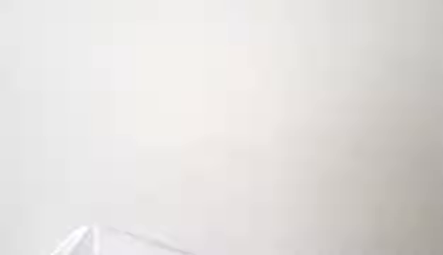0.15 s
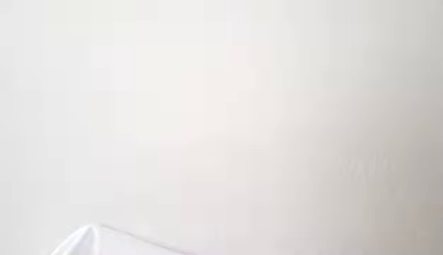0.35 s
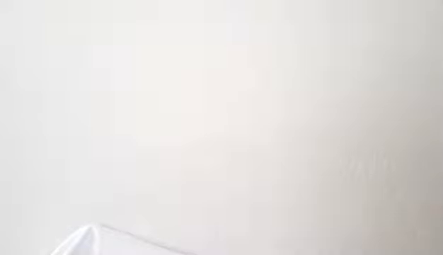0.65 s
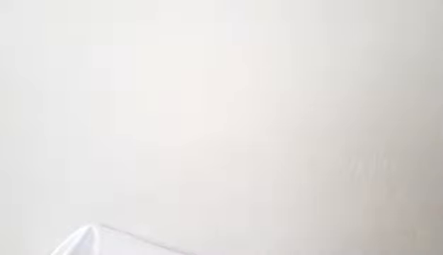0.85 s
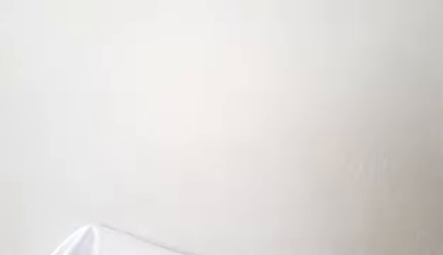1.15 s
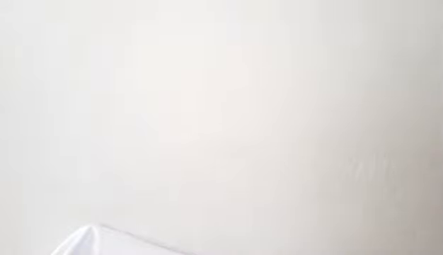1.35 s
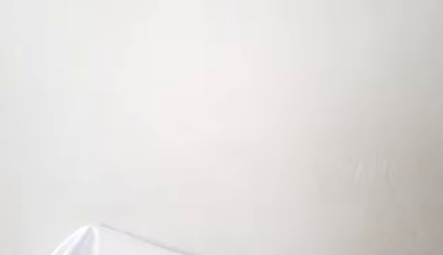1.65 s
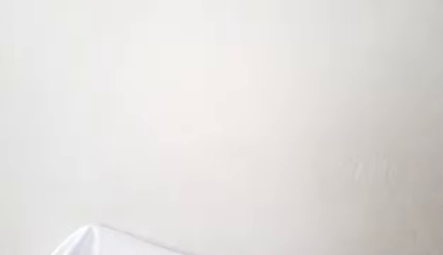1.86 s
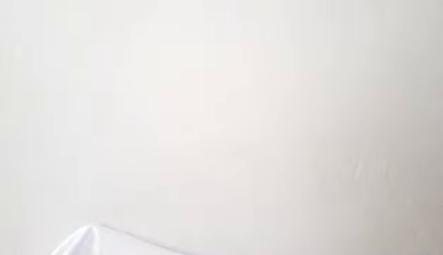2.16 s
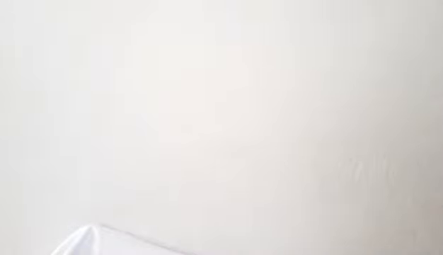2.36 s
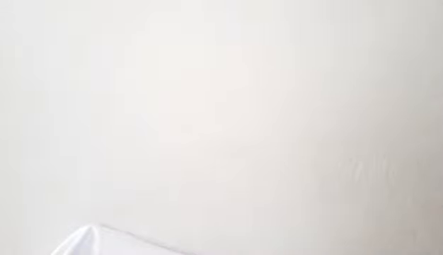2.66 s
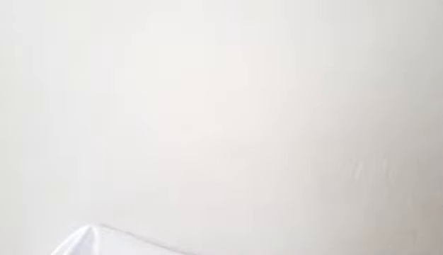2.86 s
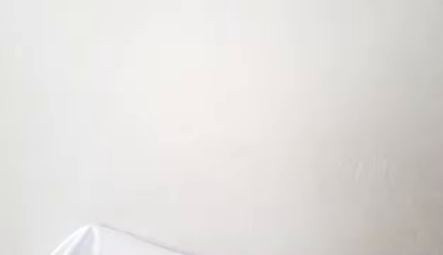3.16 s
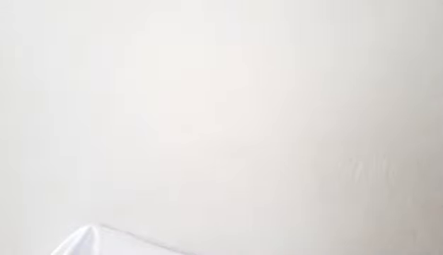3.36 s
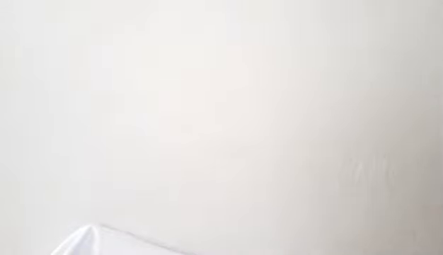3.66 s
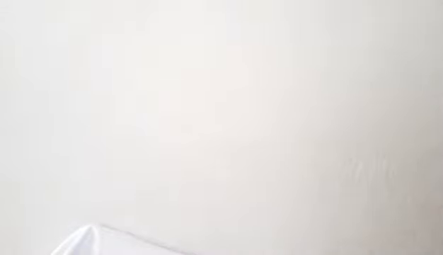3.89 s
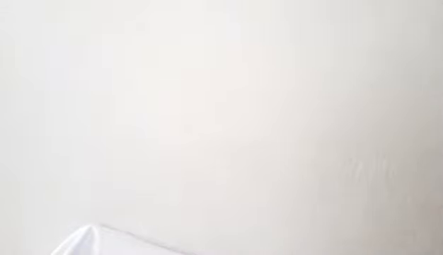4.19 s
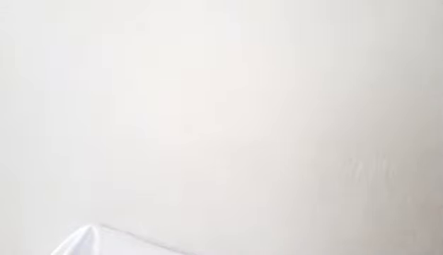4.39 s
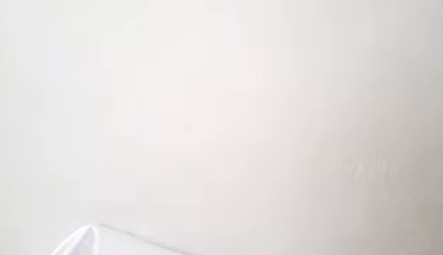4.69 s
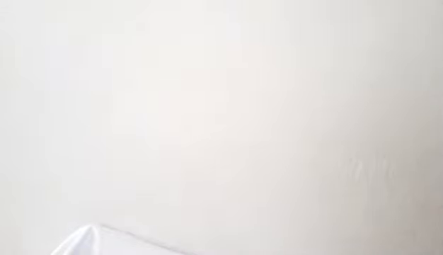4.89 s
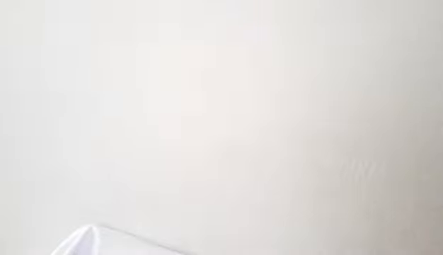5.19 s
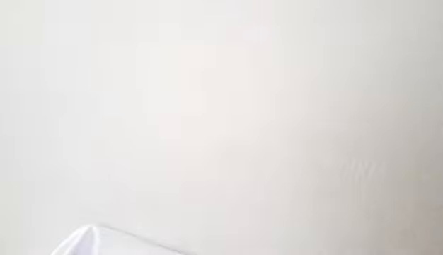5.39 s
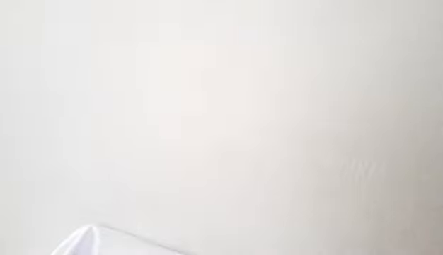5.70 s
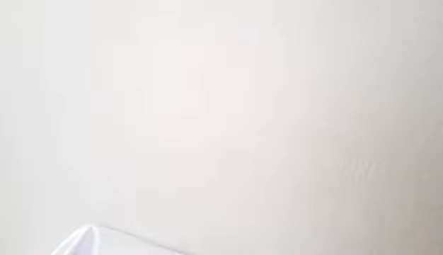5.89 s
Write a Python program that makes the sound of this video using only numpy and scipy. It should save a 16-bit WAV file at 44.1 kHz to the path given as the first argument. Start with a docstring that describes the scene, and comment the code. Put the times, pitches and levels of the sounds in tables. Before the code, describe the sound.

A steel spoon scrapes and clinks on a china plate, hands rustle quietly, then two bright clinks ring out with a short scrape in a quiet kitchen.

```python
"""Spoon, china and wooden table

A steel spoon scrapes and taps a china plate on a wooden table in a small quiet kitchen; a fork and a cup clink.
Struck things are banks of damped sines with noisy contacts; scrapes feed noise into the plate's modes.
Hand rustles, hollow rubs, scuffs, ticks and a whistling hiss are shaped noise; knocks ring the table top.
A fridge motor hums, the building rumbles under microphone hiss, and the walls add a short noise tail."""
import sys
import numpy as np
from scipy import signal
from scipy.fft import rfft, irfft, next_fast_len
from scipy.io import wavfile
from scipy.ndimage import uniform_filter1d, map_coordinates

SR = 44100
rng = np.random.default_rng(int(sys.argv[2]) if len(sys.argv) > 2 else 0)


def store_wav(level_fs):
    """Save 16-bit WAV to argv[1]."""
    pcm = np.round(np.clip(np.atleast_2d(level_fs), -1, 1) * 32767)
    wavfile.write(sys.argv[1], SR, pcm.T.astype(np.int16))


N = 266364
T = np.arange(N) / SR
RING_T = np.arange(SR // 4) / SR  # seconds after a blow


def amp(db):
    """Decibels to linear gain."""
    return 10 ** (np.asarray(db) / 20)


def unit(x):
    """Scale to an rms of 1."""
    return x / np.sqrt(np.mean(x ** 2) + 1e-20)


def along(points, hz):
    """Read a curve of (frequency_hz, value) points on a log frequency axis."""
    point_hz, values = np.transpose(points)
    return np.interp(np.log(hz + 1), np.log(point_hz + 1), values)


def filtered(x, response):
    """Filter x by a complex response of frequency."""
    size = next_fast_len(N + SR // 2)
    spectrum = rfft(x, size) * response(np.fft.rfftfreq(size, 1 / SR))
    return irfft(spectrum, size)[..., :N]


def noise(colour):
    """Noise of rms 1, coloured by a curve in dB."""
    return unit(filtered(rng.standard_normal(N), lambda hz: amp(along(colour, hz))))


def wobble(rate, size=N):
    """A smooth random curve through `rate` knots a second."""
    knots = rng.standard_normal(size // 32)
    return map_coordinates(knots[:int(size * rate / SR) + 4], [T[:size] * rate], order=2)


def complex_noise(values):
    """Two independent random curves as one complex signal."""
    return values() + 1j * values()


def peaks(modes):
    """Causal response of a bank of resonances with alternating signs."""
    def response(f):
        total = 0
        for k, (centre, width, db) in enumerate(modes):
            resonance = 1j * f * width / (centre * centre - f * f + 1j * f * width)
            total = total + (-1) ** k * amp(db) * resonance
        return total
    return response


def add(track, s, sound):
    """Mix a sound in at s seconds."""
    part = track[round(s * SR):][:len(sound)]
    part += sound[:len(part)]


def ring(hz, db, t60, attack, blur):
    """Damped sines at random phases; a drifting phase blurs each into a close cluster."""
    drift = np.cumsum(rng.standard_normal((len(hz), len(RING_T))), axis=1) / SR
    phase = rng.uniform(0, 2 * np.pi, (len(hz), 1)) + blur * hz[:, None] * drift
    decay = amp(db[:, None] - 60 * RING_T / t60[:, None])
    modes = decay * np.sin(2 * np.pi * hz[:, None] * RING_T + phase)
    return (modes * (1 - np.exp(-RING_T / attack))).sum(0)


def swell(s, rise, fall):
    """An envelope straight in dB around its peak at s; slopes in s per 20 dB, at least 0.005."""
    return amp(-20 * np.where(T < s, (s - T) / max(rise, .005), (T - s) / max(fall, .005)))


# Colour of the room rumble: frequency_hz, level_db
ROOM_COLOUR = [(13, -37), (22, -4), (60, 0), (102, 0), (222, -9), (313, -5.5), (413, -13), (552, -17),
               (600, -20), (780, -51.5), (1320, -120)]
# Colour of the microphone hiss: frequency_hz, level_db
HISS_COLOUR = [(290, -34), (500, -5), (828, 1.5), (929, -8.5), (1010, -5.5), (3110, -9.5), (3700, -14),
               (4660, -14.5), (5780, -30.5), (12000, -3.5), (15600, -7)]
# Level line of the low bumps in the building, before trim: time_s, level_db
BUMP_LEVELS = [(0.0, -59.5), (0.69, -63.5), (0.99, -61.5), (1.15, -68.5), (1.61, -71), (1.68, -62.5),
               (1.98, -62), (2.45, -59.5), (2.56, -66.5), (3.75, -72.5), (3.9, -59.5), (4.4, -60.5),
               (4.89, -67), (5.05, -70), (5.2, -60.5), (5.75, -72.5), (6.0, -60.5)]
# Colour of those bumps: frequency_hz, level_db
BUMP_COLOUR = [(22, -31.5), (40, -1), (85, 0), (130, -6), (220, -35)]
# Fridge motor tones, before trim: pitch_hz, level_db
HUM_TONES = [(296.1, -84), (398.4, -83)]
ROOM_DB, HISS_DB = -70, -72


def background():
    """Steady hiss, uneven rumble and low bumps are coloured noise; the motor hum is wavering sines."""
    hum = 0
    for hz, db in HUM_TONES:
        level = amp(db + 2.5 + 4.53 * wobble(9))
        hum = hum + level * np.sin(2 * np.pi * hz * T + .8 * wobble(14))
    bump_db = np.interp(T, *np.transpose(BUMP_LEVELS)) - 2.5 + 2.9 * wobble(9)
    bumps = amp(bump_db) * noise(BUMP_COLOUR)
    rumble = amp(ROOM_DB + 2.46 * wobble(9.2)) * noise(ROOM_COLOUR)
    return rumble + amp(HISS_DB) * noise(HISS_COLOUR) + bumps + hum


# Plate modes, for scrapes and taps: pitch_hz, rim_scrape_db, rim_strike_db, well_strike_db,
# well_scrape_db, t60_s (ringing freely)
PLATE_MODES = [(2241.6, -29.5, 3.5, -19.5, -25.5, 0.06), (2335, -5.5, -18.5, -16.5, -4, 0.17),
               (2475.9, -6, -5, -6, 2.5, 0.148), (2656.6, -18.5, 0, 4.5, -12, 0.0765),
               (2687, -20, -22, -1.5, -7, 0.1215), (3747, -24, -17, -40, -27, 0.07),
               (4669, -12, -16, -32, -20.5, 0.09), (4904, -20, -12.5, -16, -39.5, 0.072),
               (5778, -24, -19, -10, -14, 0.17), (5845, -17, -17, -8, -15.5, 0.17),
               (6300, 0.5, -4.5, -8, -16, 0.161), (6445, -14, -5.5, -7.5, -6.5, 0.12),
               (6711, -11, -5.5, -7.5, -3.5, 0.13), (7224, -4, -4.5, -13.5, 1.5, 0.22),
               (7337, -3.5, -10, -24.5, -25, 0.1998), (7620, -25, -15.5, -17, -14, 0.148),
               (7960, -17, -13.5, -24, -24, 0.1), (8322, 3, 3.5, -13.5, -6, 0.11),
               (8887, -9, -7.5, -20.5, -8, 0.1), (9280, -21, -18, -20, -11.5, 0.12),
               (9460, -11, -16, -23.5, -23, 0.0992), (9920, 1, -10, -15.5, -22, 0.1),
               (10210, -2.5, -6.5, -13, -13, 0.083), (10532, -20.5, -8, -10.5, -11, 0.14),
               (10780, -21.5, -8, -24, -17, 0.086), (11653, -22.5, -16.5, -2.5, -13, 0.12),
               (11984, -18.5, -13.5, -8.5, -4, 0.1), (12207, -7, -2.5, -8, -2, 0.12),
               (12650, -12.5, -4.5, -7.5, -7.5, 0.11), (12880, -22, -13, -10, -15, 0.1),
               (13450, -8.5, -10.5, -9.5, -7.5, 0.11), (13840, -4, -12.5, -10, -12, 0.11),
               (14260, -5.5, -6, -14.5, -13.5, 0.085), (15015, -14.5, -16, -8, -11, 0.09)]
# Unpitched part of steel on glaze, for rim scrapes and taps: frequency_hz, level_db
GLAZE_GRIT = [(530, -37), (900, -25.5), (1880, -14), (2390, 5), (3260, -15.5), (6500, -18), (7770, -11),
              (8650, -11), (12500, -12), (15500, -18)]
# Duller unpitched rasp in the well: frequency_hz, level_db
WELL_RASP = [(470, -42.5), (800, -17.5), (2180, -8.5), (2440, -11.5), (3130, -11), (7010, -17.5),
             (15500, -22)]
# Spoon drags, levels before trim: touch_s, middle_s, lift_s, touch_db, middle_db, lift_db,
# touch_tilt_db_per_octave, lift_tilt_db_per_octave, well_share (0 rim, 1 well)
RIM_DRAGS = [(0.0, .005, 0.0302, -36.5, -42.5, -48.5, -1, -3, 0.175),
             (.078, .144, 0.166, -45, -37.5, -45, 0, 2, 0.278),
             (.265, .32, 0.3874, -58.5, -43, -46, 6.5, -2.5, 0.05),
             (.45, .5, 0.515, -43.5, -44, -53, 0.14, -2.5, 0.684)]
WELL_DRAGS = [(4.43, 4.48, 4.525, -50, -46.5, -49, .01, .01, 1),
              (4.535, 4.584, 4.7044, -48.5, -44.5, -58.5, .01, .01, 0.7)]
SET_IN_DB_PER_S, DIE_AWAY_DB_PER_S = 701.5, 367.5  # slopes before touch and after lift
WANDER = .0045  # pitch drift of a mode under the moving spoon, as a share of its pitch


def scrape(strokes, start, grit, grit_db, free):
    """Rough glaze shakes the spoon in uneven grains; as the contact wanders, each mode is fed more or less."""
    span = round(start * SR) + np.arange(SR * 2 // 3)
    t, rows, size = T[span], np.array(strokes), len(span)
    stroke_db = []
    for touch, middle, lift, *levels in strokes:
        before = SET_IN_DB_PER_S * np.maximum(touch - t, 0)
        after = DIE_AWAY_DB_PER_S * np.maximum(t - lift, 0)
        stroke_db.append(np.interp(t, [touch, middle, lift], levels[:3]) - before - after)
    db = np.max(stroke_db, axis=0) + 2.55 * wobble(57.69, size)
    ends = rows[:, 0:3:2].ravel()  # touch and lift times
    tilt = np.interp(t, ends, rows[:, 6:8].ravel())
    well = np.clip(np.interp(t, ends, rows[:, 8].repeat(2)), 0, 1)
    tone = 0
    for hz, rim_db, _, _, well_db, t60 in PLATE_MODES:
        place_db = well * well_db + (1 - well) * rim_db
        level = place_db + tilt * np.log2(hz / 6000) + 3.02 * wobble(19.22, size)
        force = amp(db + level - 10.5) * complex_noise(lambda: rng.standard_normal(size))
        pole = amp(-60 / (free * t60 * SR))  # the spoon's touch leaves this share of the ring time
        shaken = signal.lfilter([np.sqrt(1 - pole ** 2)], [1, -pole], force)
        cycles = hz * np.cumsum(1 + WANDER * wobble(25, size)) / SR
        tone = tone + (shaken * np.exp(2j * np.pi * cycles)).real
    out = np.zeros(N)
    out[span] = tone + amp(db + grit_db) * noise(grit)[span]
    return out


# Whistling hisses and squeals: start_s, turn_s (where the fade begins), start_db, turn_db,
# start_pitch_hz, settled_pitch_hz, air_over_line_db, line_fall_s (per 20 dB)
WHISTLES = [(0.081, 0.153, -74, -68.5, 3855, 4060, -6.5, 0.1),
            (.29, .385, -69.5, -65.5, 4119, 3735, -4, 0.0061),
            (0.376, .4, -56, -50.5, 2720, 2650, -15, 0.0075),
            (1.772, 1.897, -71.5, -58.5, 3600, 3425, 2.5, 0.24),
            (2.09, 2.114, -79.5, -70.5, 3500, 3511, 4.5, 0.01),
            (2.734, 2.856, -84, -73, 3400, 3593, 5.5, 0.21),
            (3.27, 3.32, -81.5, -70, 1900, 2198, -3.5, 0.07),
            (3.662, 3.718, -85, -77.5, 3600, 3710, 3, 0.24),
            (4.56, 4.663, -50, -53.5, 2453, 2490, -16, 0.0165), (5.26, 5.4, -76, -72, 3880, 3494, 3.5, 0.1)]
AIR_FALL_S = 0.0925  # per 20 dB, of the airy skirt
ONSET_S = .02


def whistle():
    """Narrow noise makes a wavering line and wider noise its airy skirt; they slide in pitch, then fade."""
    out, t = np.zeros(N), T[:SR // 2]
    for start, turn, start_db, turn_db, from_hz, to_hz, air_db, line_fall in WHISTLES:
        fade = turn - start + ONSET_S
        pitch = np.interp(t, [.3 * fade, 0.76 * fade], [from_hz, to_hz])
        carrier = np.exp(2j * np.pi * np.cumsum(pitch) / SR)

        def band(rate, fall):
            waver = complex_noise(lambda: wobble(rate, len(t)))
            return unit((carrier * waver).real) * amp(-20 * np.maximum(t - fade, 0) / fall)

        line, air = band(130, line_fall), band(1050, AIR_FALL_S)
        level = amp(np.interp(t, [0, ONSET_S, fade], [-120, start_db, turn_db]))
        add(out, start - ONSET_S, level * (line + amp(air_db) * air))
    return out


# Spoon taps, levels before trim: time_s, level_db, well_share (0 rim, 1 well), tilt_db_per_octave,
# ring_length (factor on t60), clatter_db (relative to the tap)
SPOON_TAPS = [(0.4049, -23, 0.03, 3, 0.96, -1.5), (0.262, -53, 0.08, 3.5, 1.1, -8.5),
              (0.478, -42.5, 0.29, 3, 0.9, -8), (0.57, -58, 0.56, 10, 0.51, 4.5),
              (0.797, -62, 0.6, 12, .6, -15), (0.819, -50, 0.5, 3, .9, -3), (0.858, -54, 0.95, 3, 1.1, -6),
              (3.898, -21, 0.95, 0.25, 0.948, 0.5), (3.9547, -31, 0.9, -2, 0.735, -3),
              (4.004, -42, 0.86, -1, 0.645, -2), (4.2935, -44, 0.23, -1.5, 1.6, -3),
              (4.3557, -20, 0.69, 2.5, 1.174, -4.5), (4.4696, -39, 0.4, 9.5, 1.23, -18.5),
              (4.5185, -38, 0.39, 5.5, 1.52, -20), (4.5523, -35.5, 0.14, 0, 0.88, -11)]


def taps():
    """Each tap rings the plate by where it lands, with a clatter of modes too dense to tell apart."""
    hz, _, rim_db, well_db, _, t60 = np.transpose(PLATE_MODES)
    out, grit, t = np.zeros(N), noise(GLAZE_GRIT), RING_T
    for s, db, well, tilt, length, clatter_db in SPOON_TAPS:
        share = np.clip(well, 0, 1)
        place_db = share * well_db + (1 - share) * rim_db
        levels = place_db + tilt * np.log2(hz / 6000) + rng.normal(0, 0.505, len(hz))
        decay = amp(clatter_db - 60 * t / (0.108 * length)) * (1 - np.exp(-t / 0.0016))
        clatter = grit[round(s * SR):][:len(t)] * decay
        modes = ring(hz, levels, t60 * length, 0.0017, blur=0.3)
        add(out, s - .002, amp(db - 9.0) * (modes + clatter))
    return out


# Soft pitched scuffs of dishes settling: start_s, level_db, centre_hz, t60_s
DISH_SCUFFS = [(0.489, -61.5, 1350, 0.252), (2.09, -64, 1674, 0.264), (2.185, -63, 2850, 0.21),
               (2.19, -69, 1087, 0.234), (2.455, -59, 760.4, 0.225), (1.4, -72, 3126, 0.417),
               (4.13, -65.5, 970, 0.3), (4.45, -57, 712.4, 0.2), (4.129, -69, 1893, 0.47),
               (5.11, -73, 1816, 0.37), (5.2, -68.5, 1504, 0.217)]
SCUFF_WIDTH, SCUFF_RISE_S = 0.0876, 0.00625  # bandwidth over centre; onset


def scuffs():
    """Short soft bursts of friction, each in one narrow resonance."""
    out, t = np.zeros(N), RING_T
    for s, db, hz, t60 in DISH_SCUFFS:
        edges = [hz * (1 - SCUFF_WIDTH / 2), hz * (1 + SCUFF_WIDTH / 2)]
        band = signal.butter(2, edges, "bandpass", fs=SR, output="sos")
        friction = unit(signal.sosfilt(band, rng.standard_normal(len(t))))
        add(out, s, amp(db - 60 * t / t60) * (1 - np.exp(-t / SCUFF_RISE_S)) * friction)
    return out


# Hand and cloth strokes: peak_s, rise_s (per 20 dB), fall_s (per 20 dB), crisp_db, soft_db, dull_db
HAND_STROKES = [(.6, 0.74, 0.29, -75, -93.5, -79), (0.822, 0.012, 0.172, -52.5, -70, -72),
                (1.159, -0.03, 0.1141, -63, -76, -65.5), (1.435, -0.4466, 0.0181, -64.5, -75.5, -87),
                (1.69, 0.47, 0.28, -76, -99, -77), (1.779, 0.0163, 0.11, -61.5, -63.5, -83),
                (2.095, 0.03, 0.12, -69, -68, -77), (2.191, 0.1247, 0.0289, -57, -64.5, -67.5),
                (2.453, -0.1853, 0.1927, -81.5, -69, -94), (2.49, 0.052, 0.0777, -60.5, -83.5, -84.5),
                (2.62, 0.0223, 0.1236, -59, -71, -76), (2.718, 0.0352, 0.24, -80.5, -78, -74.5),
                (2.83, 0.1226, 0.1381, -65, -68, -85.5), (3.17, 0.4647, 0.0444, -78.5, -100, -75.5),
                (3.286, 0.06, 0.2933, -63, -73, -76.5), (3.42, 0.26, 0.22, -89, -75.5, -87),
                (3.78, 0.06, 0.2, -66.5, -82.5, -78), (4.05, 0.3571, -0.4856, -71, -73, -74),
                (4.2, 0.29, 0.1857, -88.5, -85, -68), (4.76, 0.47, 0.2, -77, -76.5, -76.5),
                (4.925, 0.09, 0.06, -63, -88.5, -97), (5.19, 0.22, 0.28, -65.5, -70, -75),
                (5.421, 0.188, 0.16, -75, -67.5, -75.5), (5.7, 0.74, 3.5, -74, -83, -114.5),
                (6.0, 0.2346, 4, -68.5, -63.5, -69.5)]
# Colours of crisp rustle, softer swish and dull brushing: frequency_hz, level_db
CRISP_RUSTLE = [(5000, -41.5), (8200, 0.5), (11000, 0), (15500, -3.5)]
SOFT_SWISH = [(2000, -12.5), (4200, -4), (5500, -2.5), (7500, -7), (10000, -25)]
DULL_BRUSH = [(500, -13), (900, -1), (1700, -5.5), (2600, -4.5), (4000, -25.5)]


def hand():
    """Skin and cloth moving over table and dishes; each stroke has its own blend of three colours."""
    grain = amp(0.47 * wobble(70))
    shapes = np.array([swell(s, rise, fall) for s, rise, fall, *_ in HAND_STROKES])
    levels = amp(np.array(HAND_STROKES)[:, 3:]).T @ shapes
    colours = (CRISP_RUSTLE, SOFT_SWISH, DULL_BRUSH)
    return grain * sum(level * noise(colour) for level, colour in zip(levels, colours))


# Hollow rubs of a dish on the table, levels before trim: start_s, level_db, t60_s
DISH_RUBS = [(0.822, -50, 0.299), (1.154, -55, 0.384), (1.428, -58.5, 0.302), (1.664, -70.5, 0.65),
             (1.78, -61.5, 0.417)]
# Resonances of the hollow under the dish: centre_hz, width_hz, level_db
HOLLOW_MODES = [(2280, 126, 9.5), (1270, 39, -18), (3110, 21, -12.5)]


def rubs():
    """Short friction bursts sounding in the hollow under the dish."""
    drive, t = np.zeros(N), T[:SR // 2]
    for s, db, t60 in DISH_RUBS:
        add(drive, s, amp(db + 1.5 - 60 * t / t60) * (1 - np.exp(-t / 0.0243)))
    hollow = unit(filtered(rng.standard_normal(N), peaks(HOLLOW_MODES)))
    return drive * amp(0.8 * wobble(49.92)) * hollow


# Modes of the table top: pitch_hz, level_db, t60_s
TABLE_MODES = [(400, -14, .04), (686, -3, 0.06), (860, -14, 0.05), (1367, -31.5, 0.2), (1788, -15, 0.0485),
               (1982, -21, 0.055), (2658, -35, 0.061)]
# Unpitched part of a knock: frequency_hz, level_db
WOOD_THUD = [(120, -47.5), (300, -15.5), (700, 5), (1300, -23), (2070, -0.5), (3500, -26.5), (8000, -61)]
# Knocks on the table, levels before trim: start_s, level_db, tilt_db_per_octave
TABLE_KNOCKS = [(0.939, -64.5, -2), (2.094, -74.5, -4.5), (2.454, -66, -1), (4.211, -33.5, 3),
                (5.006, -65.5, 0.5)]
# The whole table bobs after a knock: pitch, level at zero tilt, time to its widest swing
SWAY_HZ, SWAY_DB, SWAY_S = 90, 1.5, .017


def knocks():
    """Blunt contacts ring the table top, then the whole table bobs; a short crack leads."""
    hz, db, t60 = np.transpose(TABLE_MODES)
    out, wood, t = np.zeros(N), noise(WOOD_THUD), RING_T
    for s, peak_db, tilt in TABLE_KNOCKS:
        crack = 1.75 * amp(-60 * t / 0.0133) * np.sin(2 * np.pi * 800 * t)
        rough = uniform_filter1d(rng.standard_normal(len(t)), size=3)
        crack += 0.45 * amp(-60 * t / .007) * rough
        thud = 0.437 * amp(-60 * t / 0.07) * wood[round(s * SR):][:len(t)]
        levels = db + tilt * np.log2(hz / 700)
        modes = ring(hz, levels, t60, 0.8 / hz[:, None], blur=0.93)
        swing = (t / SWAY_S * np.exp(1 - t / SWAY_S)) ** 3
        # brighter knocks sway the table less
        sway = amp(SWAY_DB - 2.84 * tilt) * swing * np.sin(2 * np.pi * SWAY_HZ * t)
        add(out, s, amp(peak_db + 1.5) * (modes + crack + thud + sway))
    return out


# Modes of the fork tines and of the cup: pitch_hz, level_db, t60_s
FORK_MODES = [(6900, -3, .05), (8120, -1, .08), (9250, -3, .04), (12900, -8, .03)]
CUP_MODES = [(2215, -17, 0.072), (2731, -0.5, 0.125), (3658, -14.5, 0.126), (4600, -17, 0.09),
             (4915, -6.5, 0.041), (5910, -14, 0.125), (6480, -4.5, 0.062), (7310, -20, .08),
             (8080, -19.5, 0.105), (8516, -18, .1)]
# Light touches on each: time_s, level_db, onset_s, click_db (relative to the touch)
FORK_TOUCHES = [(1.108, -61, .0006, -9), (1.1435, -62, .001, -12)]
CUP_TOUCHES = [(3.3222, -43.5, 0.00064, -1), (3.345, -47.5, 0.0058, -17)]
# Unpitched part of a touch: frequency_hz, level_db
TOUCH_CLACK = [(1200, -37), (2200, 3), (5000, -3.5), (7000, -4.5), (9000, -9), (14000, -15.5)]


def clink(modes, touches):
    """A small thing is touched lightly: a click of noise with a faint tail joins its ringing modes."""
    hz, db, t60 = np.transpose(modes)
    out, clack, t = np.zeros(N), noise(TOUCH_CLACK), RING_T
    for s, peak_db, onset, click_db in touches:
        decay = amp(click_db - 60 * t / 0.009) + 0.2 * amp(-60 * t / 0.122)
        click = decay * clack[round(s * SR):][:len(t)]
        levels = db + rng.normal(0, 0.83, len(hz))
        add(out, s - .001, amp(peak_db) * (ring(hz, levels, t60, onset, blur=0.5) + click))
    return out


# Small dry ticks, levels before trim: time_s, level_db, centre_hz, t60_s
DRY_TICKS = [(1.153, -48.5, 8040, 0.5), (1.96, -54.5, 8700, 0.33), (2.4004, -58.5, 4040, 0.138),
             (2.4251, -44, 14600, 0.16), (2.452, -43.5, 11430, 0.107), (2.4857, -46, 9960, 0.16),
             (3.1277, -52.5, 10580, 0.193), (4.235, -52, 12600, 0.6), (5.701, -59.5, 8100, 0.17)]


def ticks():
    """A broad click over a short hiss around its own pitch, both from one burst of noise."""
    out, t = np.zeros(N), T[:SR // 4]
    for s, db, hz, t60 in DRY_TICKS:
        edges = [hz * .84, min(hz * 1.18, SR / 2 - 1)]
        band = signal.butter(2, edges, "bandpass", fs=SR, output="sos")
        grain = rng.standard_normal(len(t))
        click = 1.08 * np.diff(grain, prepend=0) * amp(-60 * t / 0.00292)
        hiss = 0.562 * unit(signal.sosfilt(band, grain)) * amp(-60 * t / t60)
        add(out, s - .001, amp(db - 10.5) * (click + hiss))
    return out


# Decay of the kitchen's answer: frequency_hz, t60_s
WALL_DECAY = [(200, 0.194), (2500, 0.212), (12000, 0.041)]


def walls(x):
    """The kitchen answers with a noise tail 150 samples late; each frequency dies at its own speed."""
    hz, t, z = signal.stft(rng.standard_normal(SR // 2), SR, nperseg=256)
    decay = amp(-60 * t / along(WALL_DECAY, hz)[:, None])
    tail = signal.istft(z * decay, SR, nperseg=256)[1]
    return signal.fftconvolve(np.pad(x, (150, 0)), tail / np.linalg.norm(tail))[:N]


def scene():
    """Dishes and table sound in the kitchen; left and right carry slightly different echoes."""
    strokes = scrape(RIM_DRAGS, 0, GLAZE_GRIT, grit_db=-14.0, free=0.75)
    strokes += scrape(WELL_DRAGS, 4.3, WELL_RASP, grit_db=-8.5, free=0.8)
    clinks = clink(FORK_MODES, FORK_TOUCHES) + clink(CUP_MODES, CUP_TOUCHES)
    near = strokes + taps() + knocks() + clinks + ticks()
    soft = whistle() + scuffs() + hand() + rubs()
    sound = near + amp(-9.0) * walls(near) + soft + background()
    return sound + amp(-60.0) * walls(sound) * [[1], [-1]]


# Left-right balance by frequency: frequency_hz, left_minus_right_db
SIDE_BALANCE = [(60, -1), (200, 0), (330, 0), (700, 1), (1200, 0), (5000, 0), (6400, -2), (8300, 4),
                (10000, 3), (11300, 0)]
TOP_HZ = 15750  # band limit


def record(dry):
    """A fixed left-right balance by frequency and a little opposed rumble, then the band limit."""
    def balance(hz):
        sides = amp(along(SIDE_BALANCE, hz) * np.array([[.5], [-.5]]))
        return sides * (hz < TOP_HZ)

    opposed_rumble = amp(ROOM_DB - 30.0) * noise(ROOM_COLOUR) * [[1], [-1]]
    return filtered(dry + opposed_rumble, balance)


dry = scene()
out = record(dry)
store_wav(out)
```